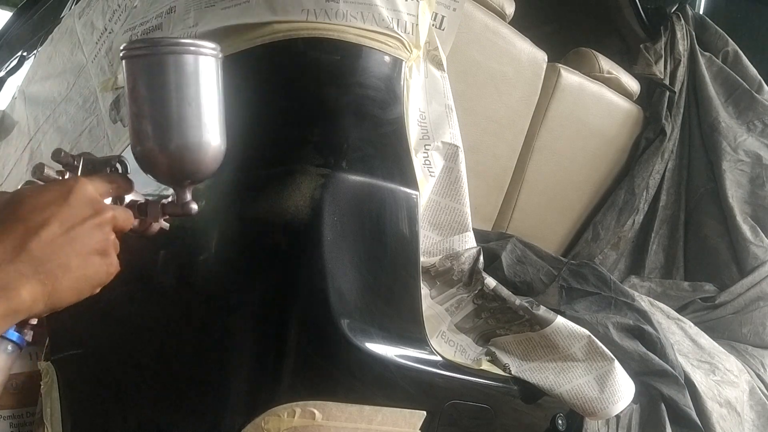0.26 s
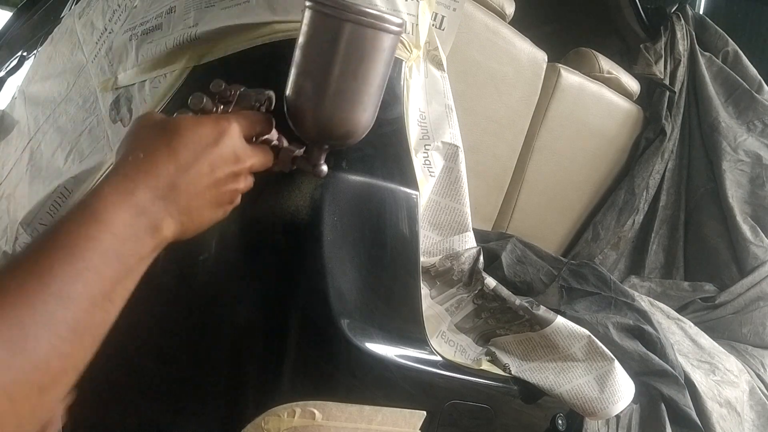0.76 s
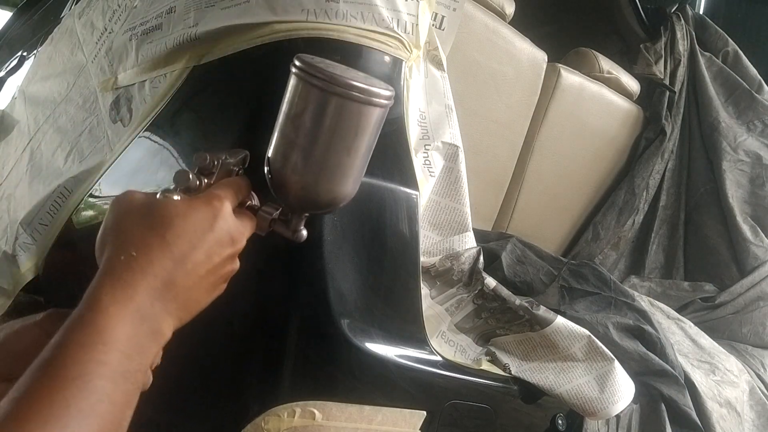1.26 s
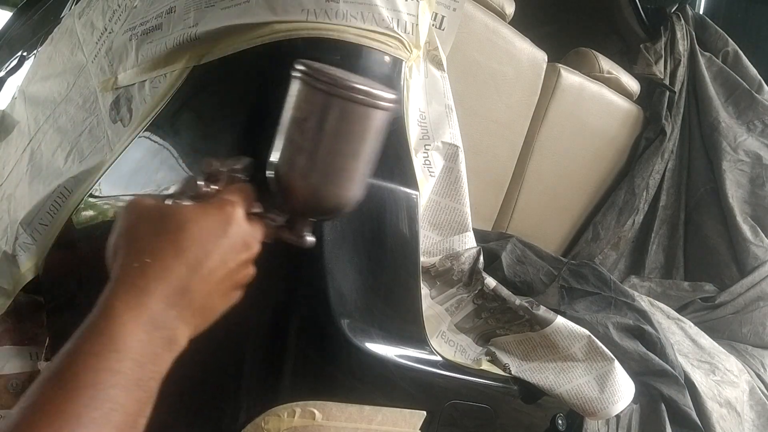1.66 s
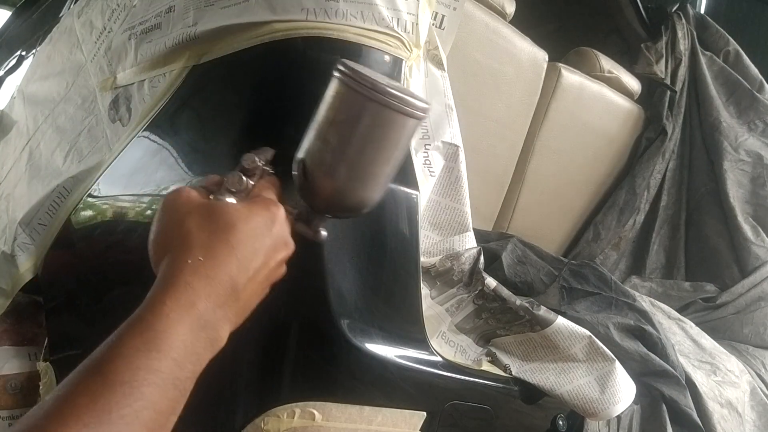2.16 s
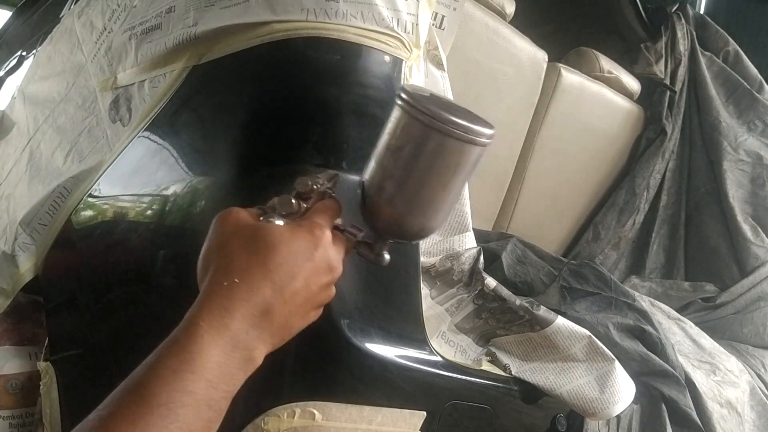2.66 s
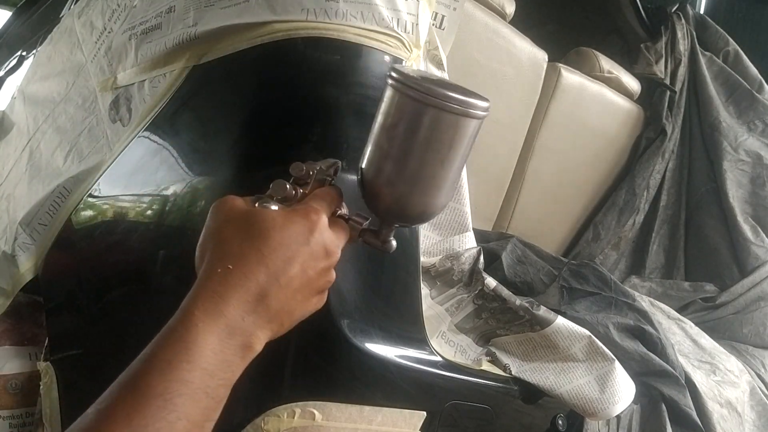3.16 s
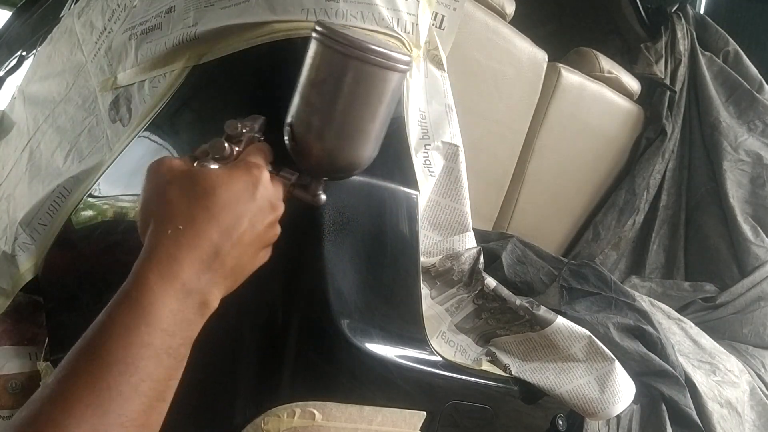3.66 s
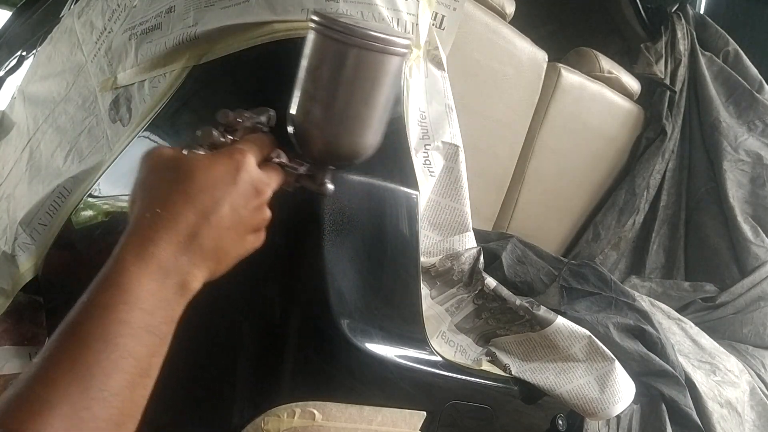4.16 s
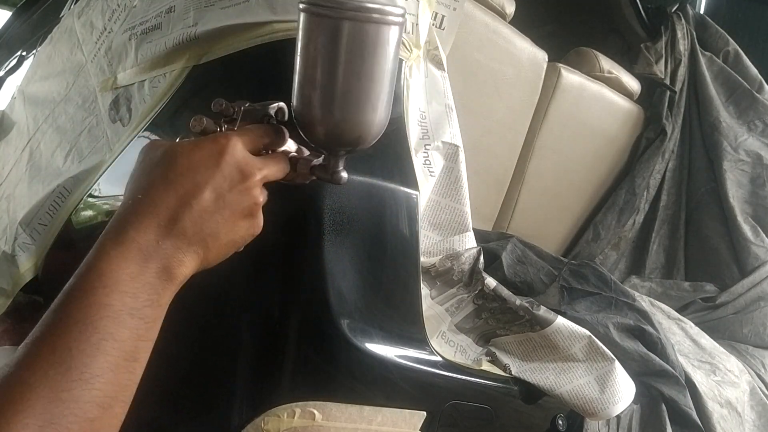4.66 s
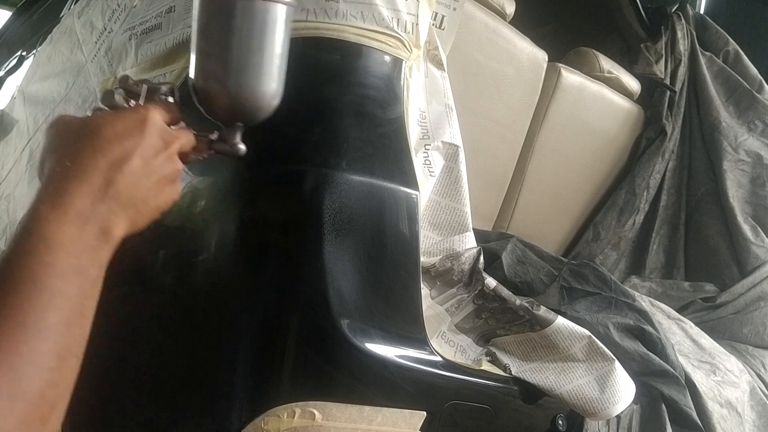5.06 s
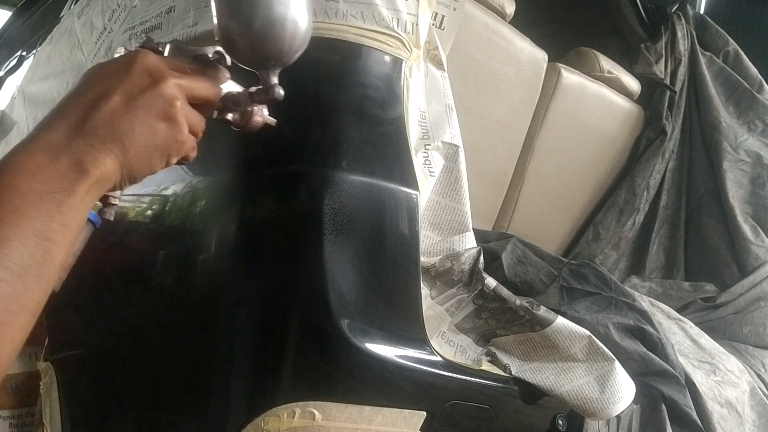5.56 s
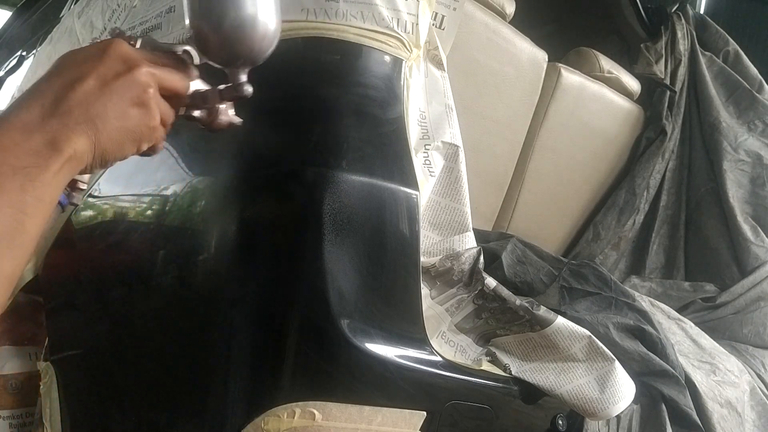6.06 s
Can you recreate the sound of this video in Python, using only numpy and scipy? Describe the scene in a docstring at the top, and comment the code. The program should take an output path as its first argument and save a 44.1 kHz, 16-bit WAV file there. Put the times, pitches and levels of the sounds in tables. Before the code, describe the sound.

Bright, flickering compressed-air hiss from a spray gun, one brief dip and a sharp pop of air, with faint dull thuds behind.

```python
"""A paint spray gun, moving along a panel, hisses about a metre from a phone with two microphone ports.
The jet is filtered noise with flickering bands; its trigger eases off for half a second, then opens with
a pop of stored air. Wandering delayed copies give the mid hiss shifting streaks. Beneath lies a low rumble
of noise with narrow peaks and dips; damped sines make hollow taps, and swelling, dying noise makes dull
thuds from the workshop."""
import sys
import numpy as np
from scipy import signal
from scipy.fft import rfft, irfft
from scipy.io import wavfile
from scipy.ndimage import uniform_filter1d, map_coordinates

SR = 44100
rng = np.random.default_rng(int(sys.argv[2]) if len(sys.argv) > 2 else 0)


def output_pcm(signal):
    """Save a mono or channel-first signal as 16-bit PCM at the path in sys.argv[1].

    Samples are clipped to [-1, 1] before scaling.
    """
    pcm = np.clip(np.atleast_2d(signal).T, -1, 1) * 32767
    wavfile.write(sys.argv[1], SR, np.round(pcm).astype(np.int16))


N = 279153
T = np.arange(N) / SR  # time in s
HZ = np.arange(N // 2 + 1) * SR / N + 1e-3  # frequency bins, kept above zero for logarithms
CENTRE_MS = 0.1225  # left port lag with the jet's levels balanced; the treble always keeps it
EDGE_HZ = 12020  # steep upper edge of the main band


def undb(db):
    """Decibel law: the amplitude gain of a level in dB."""
    return 10 ** (np.asarray(db) / 20)


def over_hz(table):
    """Spectral interpolation: a table of (hz, value) read at every bin along a logarithmic axis."""
    hz, value = np.transpose(table)
    return np.interp(np.log(HZ), np.log(hz), value)


def drift(rate):
    """Slow random modulation: levels drawn rate times per second and smoothed twice; spread near 1."""
    hold = int(SR / rate)
    levels = np.repeat(rng.standard_normal(N // hold + 1), hold)
    smooth = uniform_filter1d(uniform_filter1d(levels, hold), hold)
    return 1.25 * smooth[:N]


def burst(start_s, rise_ms, t60_s):
    """Exponential decay: an envelope that swells to 1 over rise_ms, then falls 60 dB in t60_s."""
    age_s = T - start_s - rise_ms / 1000  # counted from the top
    swell = np.clip(1 + age_s * 1000 / rise_ms, 0, 1) ** 2
    decay = undb(-60 * np.maximum(age_s, 0) / t60_s)
    return np.where(age_s < 0, swell, decay)


def rings(table):
    """Resonance: gain of bell-shaped peaks and dips from rows of (hz, width_hz, level_db)."""
    return undb(sum(db / (1 + (2 * (HZ - hz) / width_hz) ** 2) for hz, width_hz, db in table))


def parts(alike, lag_ms):
    """Partial coherence: spectra of noise shared by both ports, late on the left, and of each port's own."""
    shared, left, right = rng.standard_normal((3, N))
    late_place = np.arange(N) - lag_ms * SR / 1000
    late = rfft(map_coordinates(shared, [late_place], order=5, mode="wrap"))
    # the treble keeps one lag wherever the source is
    treble = np.clip((HZ - 4000) / 2000, 0, 1)
    fixed_late = rfft(shared) * np.exp(-2j * np.pi * HZ * CENTRE_MS / 1000)
    late += treble * (fixed_late - late)
    share = np.clip(over_hz(alike), 0, 1)  # of the power
    return np.array([np.sqrt(share) * [late, rfft(shared)], np.sqrt(1 - share) * rfft([left, right])])


def pair(alike, lag_ms):
    """Superposition: shared and separate noise summed into one spectrum per port."""
    return parts(alike, lag_ms).sum(axis=0)


def bands(spectra, low_hz, count):
    """Filter bank: overlapping half-octave slices that add up to the whole."""
    place = np.clip(2 * np.log2(HZ / low_hz), 0, count - 1)
    for k in range(count):
        weight = np.clip(1 - abs(place - k), 0, 1)
        yield low_hz * 2 ** (k / 2), irfft(spectra * weight, N)


def gun():
    """Turbulent jet noise: the trigger sets the flow, paint feeds the lower hiss, eddies make bands flicker."""
    # jet as each port colours it, relative: hz, level_db (per Hz)
    jet_left, jet_right = [(400, -33), (1000, -22.5), (1900, -18), (2400, -14), (4300, -12), (6200, -10),
                           (8300, -10), (9300, -5.5), (10300, -4), (11900, 1), (13200, 4), (15500, -1)], [(400, -42), (1000, -20), (1900, -17.5), (2400, -12.5),
                                             (3500, -10.5), (5200, -8.5), (7200, -5), (8800, -1),
                                             (10300, -1.5), (11900, -5.5), (15500, -21)]
    # likeness of the jet at both ports: hz, share (0-1)
    jet_alike = [(800, 0.38), (1600, 0.34), (2800, 0.33), (3500, 0.37), (4500, 0.24), (6200, 0.35),
                 (7200, 0.18), (9000, 0.14), (12000, 0.17)]
    # the right port's lower resonance holds its treble back: hz, phase_rad
    right_drag = [(2800, 0), (4200, 0.6), (5500, 0.27), (7200, 3), (9300, 4), (12000, 5)]
    # gun moving along the panel: start_s, left_lag_ms, treble_db, lower_hiss_db, direct_above_usual_db
    path = [(0, 0.1, -36, -38.5, -1.5), (.3, 0.19, -36, -39, 0), (.64, 0.19, -36, -38.5, 4),
            (.9, 0.17, -37.5, -38.5, 2.5), (1.15, 0.2, -37.5, -34.5, 1), (1.3, 0.2, -37, -35.5, -0.5),
            (1.9, .12, -39.5, -40, 0), (2.7, 0.076, -39.5, -40, 0), (3.4, 0.092, -39, -40, -0.5),
            (4.2, 0.11, -40, -40, -0.5), (4.5, 0.12, -39, -41.5, .5), (4.9, 0.08, -39, -40, 1.5),
            (5.2, 0.16, -37.5, -40, 0.5), (5.5, 0.11, -37, -39.5, 1), (6.0, 0.16, -37, -40, 1.5),
            (6.33, .16, -37.5, -36.5, -2)]
    # loss with the trigger eased: hz, direct_jet_db, panel_splash_db
    eased_loss = [(700, -13.5, -13), (1400, -14, -8), (2000, -5.5, -7), (2900, -5, -14), (4000, -9, -13.5),
                  (5600, -7, -7), (8000, -7, -7), (11300, -8, -6.5)]
    # valve pop: level_db, rise_ms, t60_s, afterflow_db, afterflow_t60_s, loss_below_hiss_peak_db (per octave)
    pop_db, rise_ms, t60_s, after_db, after_t60_s, loss_db = (-14, 6.5, 0.01, -30.5, 0.5, 10)
    # trigger tick, then short cracks and puffs of the pop: start_s, level_db, t60_s
    cracks = [(.6485, -40, 0.011), (1.172, -23, 0.035), (1.175, -13, 0.004), (1.18, -32, 0.0059),
              (1.1905, -29, .02)]
    ease_s, pop_s = 0.65, 1.1725  # trigger eases off, opens again
    sink_s, refill_s = 0.026, 0.1  # time constants: flow sinks, paint fan builds up again
    creep_db_per_s = 3  # air creeps back while eased
    pan_db_per_ms = 1  # left minus right follows the lag between the ports
    # random level flutter of the separate noise, strongest around this frequency
    flutter_hz, flutter_db, flutter_per_s = 3200, 2.5, 16

    path_s, *columns = np.transpose(path)
    lag_ms, treble_db, lower_db, direct_db = (np.interp(T, path_s, c) for c in columns)
    aim_db = np.array([[.5], [-.5]]) * pan_db_per_ms * (lag_ms - CENTRE_MS)
    eased = (1 - np.exp(-np.maximum(T - ease_s, 0) / sink_s)) * (T < pop_s)
    refill = np.exp(-np.maximum(T - pop_s, 0) / refill_s)
    thin = np.where(T < pop_s, eased, refill)  # splash still missing
    flow_db = eased * creep_db_per_s * (T - ease_s)

    air = parts(jet_alike, lag_ms) * undb([over_hz(jet_left), over_hz(jet_right)])
    air[:, 1] *= np.exp(-1j * over_hz(right_drag))
    air /= np.std(irfft(air.sum(axis=0) * (HZ < EDGE_HZ), N))

    # stored pressure leaves in ragged puffs; the right port peaks later
    puffs = undb(pop_db + 2.7 * np.array([drift(700), drift(700)]))
    pop = puffs * [burst(pop_s, rise_ms + late_ms, t60_s) for late_ms in (-1.2, 1.4)]
    pop += undb(after_db) * burst(pop_s, rise_ms, after_t60_s)
    pop += sum(undb(db) * burst(crack_s, 0.7, crack_t60_s) for crack_s, db, crack_t60_s in cracks)

    eased_hz, *losses = np.transpose(eased_loss)
    surge, out = drift(12), 0
    # the direct jet is the shared noise, the splash off the panel each port's own
    for hz, (jet, splash) in bands(air, low_hz=746, count=10):
        fan = np.clip(np.log2(6500 / hz) / 0.7, 0, 1)  # share of the band that belongs to the paint fan
        colour_db = fan * lower_db + (1 - fan) * treble_db
        flicker_db = 0.41 * surge + 1.08 * drift(20) + 0.93 * drift(150)
        flutter_bell = 1 / (1 + (1.7 * np.log2(hz / flutter_hz)) ** 2)
        band_flutter_db = flutter_db * drift(flutter_per_s) * flutter_bell
        jet_db, splash_db = (np.interp(np.log(hz), np.log(eased_hz), loss) for loss in losses)
        direct = jet * undb(eased * jet_db + direct_db + 0.92 * drift(6.8))
        scattered = splash * undb(thin * splash_db - 0.53 * direct_db + band_flutter_db)
        steady = (direct + scattered) * undb(flow_db + colour_db + flicker_db + aim_db)
        dull_db = loss_db * np.clip(np.log2(9000 / hz), 0, 1.3)  # the pop is brighter than the steady jet
        out = out + steady + (jet + splash) * undb(-dull_db) * pop
    return out


def streaks(jet):
    """Comb filtering: delayed mid hiss, its delays wandering at random, gives narrow shifting streaks."""
    # delayed copies: delay_ms, wander_ms, wanders_per_s, level_db
    copies = [(1.7, 0.14, 9, -6), (4.3, 0.191, 14, -6), (7.9, 0.297, 11, -7)]
    # limits of the mid hiss: low_hz, high_hz
    mid_band = (2260, 6560)
    shade = 0.31  # direct mid hiss given up, as a share of each copy's gain
    mid = signal.sosfilt(signal.butter(2, mid_band, "bandpass", fs=SR, output="sos"), jet)
    for delay_ms, wander_ms, rate, db in copies:
        place = np.arange(N) - (delay_ms + wander_ms * drift(rate)) * SR / 1000
        late = np.array([map_coordinates(port, [place], order=3, mode="mirror") for port in mid])
        jet = jet + undb(db) * late - shade * undb(db) * mid
    return jet


def workshop():
    """Coloured noise: low rumble of machines and street swells slowly, its deep part most alike at both ports."""
    # relative rumble spectrum: hz, level_db (per Hz)
    rumble_colour = [(12, -46), (20, -6), (45, 1), (80, 4), (150, 1.5), (190, 0), (270, -4.5), (410, -7.5),
                     (540, -12), (780, -18.5), (1100, -15.5), (1800, -27), (2600, -51), (4800, -62)]
    # likeness at both ports: hz, share (0-1)
    rumble_alike = [(30, 0.7), (60, 1), (250, 0.78), (500, 0.65), (1000, 0.45)]
    # narrow peaks and dips in the rumble: hz, width_hz, level_db
    peaks_and_dips = [(113.3, 14.6, 5), (224, 20, 1), (274, 19, -2.5), (385.5, 5.3, 0), (490, 5.2, 9.5),
                      (682, 8.6, 5.5), (867, 5.4, -9)]
    # level of the deep rumble: start_s, lowest_db, boom_db
    deep = [(0, -60, -62), (.5, -65, -57.5), (.9, -58, -62), (1.95, -58.5, -59), (2.2, -61, -52.5),
            (2.55, -56, -62), (3.1, -61, -58.5), (3.3, -57, -57.5), (3.7, -57, -52.5), (4.2, -61, -58),
            (4.6, -58, -54), (4.85, -57, -54.5), (5.2, -58, -57), (6.0, -63, -62), (6.33, -59, -58)]
    # level of the rumble above the deep bands: start_s, level_db
    upper = [(0, -54), (.9, -55), (1.5, -55.5), (2.2, -54), (2.7, -51), (3.6, -55.5), (4.2, -55.5),
             (5.2, -55), (5.9, -54), (6.33, -53.5)]
    rumble = pair(rumble_alike, lag_ms=0.022) * undb(over_hz(rumble_colour)) * rings(peaks_and_dips)
    rumble /= np.std(irfft(rumble, N))
    deep_s, *columns = np.transpose(deep)
    lowest_db, boom_db = (np.interp(T, deep_s, c) for c in columns)
    upper_db = np.interp(T, *np.transpose(upper))
    out = 0
    for hz, band in bands(rumble, low_hz=36.2, count=9):
        level_db = lowest_db if hz < 90 else boom_db if hz < 170 else upper_db
        out = out + band * undb(level_db + 1.23 * drift(4.88) + 0.94 * drift(14))
    return out * undb([[-.5], [.5]])  # left, right


def taps():
    """Damped modes: light knocks on something hollow ring briefly, with two weaker modes above the first."""
    # hollow taps and low bumps: start_s, lowest_mode_db, pitch_hz
    knocks = [(.965, -52, 240), (.976, -48, 358), (3.041, -45, 110), (3.209, -51, 86),
              (3.257, -43.5, 118.5), (3.286, -40.5, 111), (3.366, -40.5, 114), (3.393, -43, 119),
              (3.435, -47, 125), (3.475, -47, 95), (3.58, -52, 99), (3.65, -50, 111), (3.877, -46.5, 414),
              (3.893, -49, 325), (3.908, -55, 350), (4.555, -52, 90), (4.74, -49, 106), (4.825, -49, 117),
              (5.742, -43, 364), (6.278, -49.5, 116)]
    cycles = 14  # rung until 60 dB down
    out = 0
    for start_s, level_db, hz in knocks:
        turn = 2 * np.pi * hz * (T - start_s)
        modes = np.sin(turn) + 0.65 * np.sin(1.138 * turn) + 0.46 * np.sin(1.46 * turn)
        # swells over about a cycle
        out = out + undb(level_db) * modes * burst(start_s, 900 / hz, cycles / hz)
    return out


def thuds():
    """Resonant decay: the valve's thump and far blows boom dully; their rattle dies sooner."""
    # far blows: start_s, peak_db, centre_hz, rattle_above_boom_db, rise_ms, width_share, t60_s
    far_blows = [(1.63, -53, 1900, -20, 21, 0.98, 0.36), (2.912, -39.5, 302, -12.5, 17, 1.24, 0.68),
                 (2.95, -46.5, 330, -13, 18, 1.3, 0.71), (3.25, -52, 58, -36, 17, 0.92, 2),
                 (3.87, -56, 300, -18, 8, 1.8, 0.81), (4.53, -60, 250, -20, 33, 1.5, 0.68),
                 (4.61, -51, 209, -14, 25, 1.8, 0.92), (4.66, -55, 350, -10, 40, 1.8, .9),
                 (4.74, -67, 300, -23, 30, 0.98, .8), (5.68, -57, 250, -20, 62, 1, 0.57),
                 (6.2, -53.5, 200, -22, 82, 1.2, 0.91)]
    # thump of the valve: peak_db, centre_hz, rattle_above_boom_db, rise_ms, width_share, t60_s
    thump = (-46, 220, -2, 5, 5, 0.16)
    # resonances colouring all thuds and the valve's thump: hz, width_hz, level_db
    resonances = [(273.5, 27, 6), (393, 22, 4), (485, 20, 4), (615, 18, 4), (705, 16, 5), (860, 18, 4.5),
                  (976, 25, 6), (1250, 35, 3), (1510, 45, 2), (1900, 60, 3)]
    thump_s = 1.176  # the valve seats just after the air breaks through
    alike = [(100, 0.84), (400, 0.75), (1500, 0.18)]  # hz, share (0-1)
    air = pair(alike, lag_ms=0.091) * rings(resonances)
    rattle = irfft(air / np.hypot(1, (HZ - 1000 ** 2 / HZ) / 2600) ** 1.3, N)
    rattle /= np.std(rattle)
    out = 0
    for start_s, peak_db, hz, rattle_db, rise_ms, width, t60_s in [*far_blows, (thump_s, *thump)]:
        # steep far below the centre, gentler above
        skirts = np.hypot(1, (HZ - hz ** 2 / HZ) / (width * hz)) ** 1.32
        low_cut = np.hypot(1, 0.11 * hz / HZ) ** 3
        boom = irfft(air / skirts / low_cut, N)
        boom /= np.std(boom)
        out = out + undb(peak_db) * boom * burst(start_s, rise_ms, t60_s)
        out = out + undb(peak_db + rattle_db) * rattle * burst(start_s, 0.18 * rise_ms, 0.32 * t60_s)
    return out


def scene():
    """Superposition: gun with its streaks, low rumble, taps and thuds add at the two ports."""
    return streaks(gun()) + workshop() + taps() + thuds()


def record(dry):
    """Band limiting: a steep edge, a faint top band mostly on the left, then a final cut."""
    top_hz = 15780  # final cut
    low = signal.sosfilt(signal.ellip(12, .2, 70, EDGE_HZ, fs=SR, output="sos"), dry)
    top = signal.sosfilt(signal.butter(4, [12900, 15600], "bandpass", fs=SR, output="sos"), dry)
    both = low + undb([[-16], [-50]]) * top  # left, right
    return signal.sosfilt(signal.ellip(10, .2, 72, top_hz, fs=SR, output="sos"), both)


dry = scene()
out = record(dry)
output_pcm(out)
```